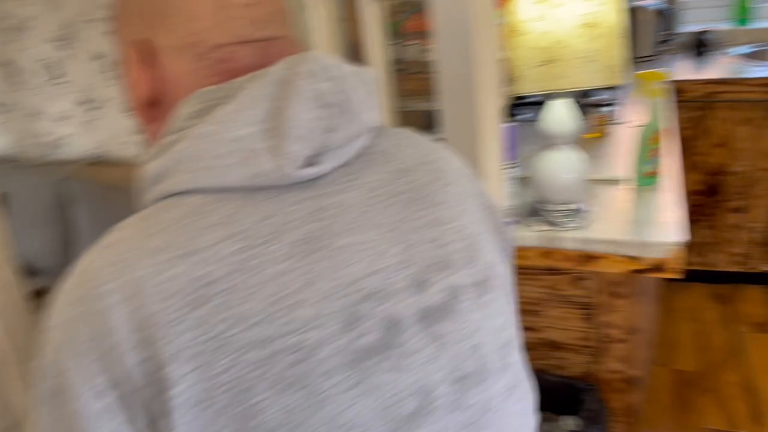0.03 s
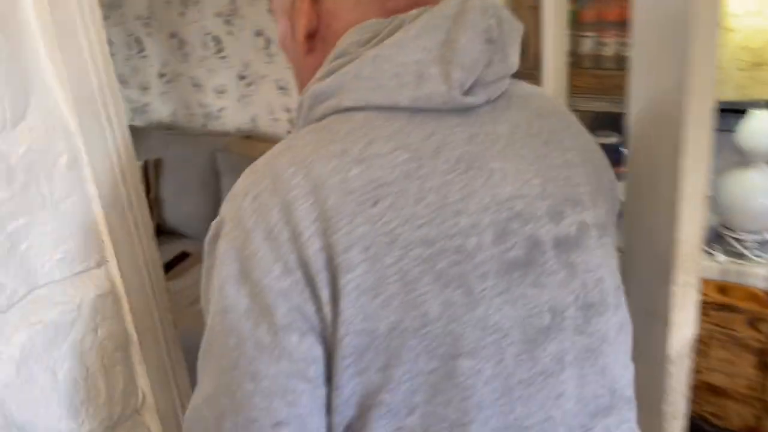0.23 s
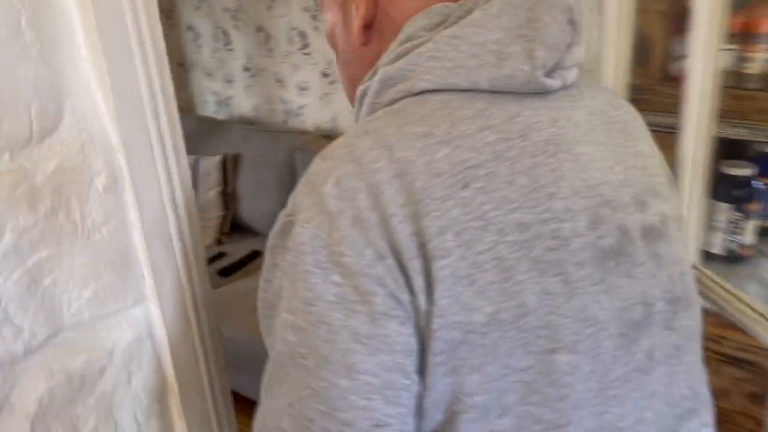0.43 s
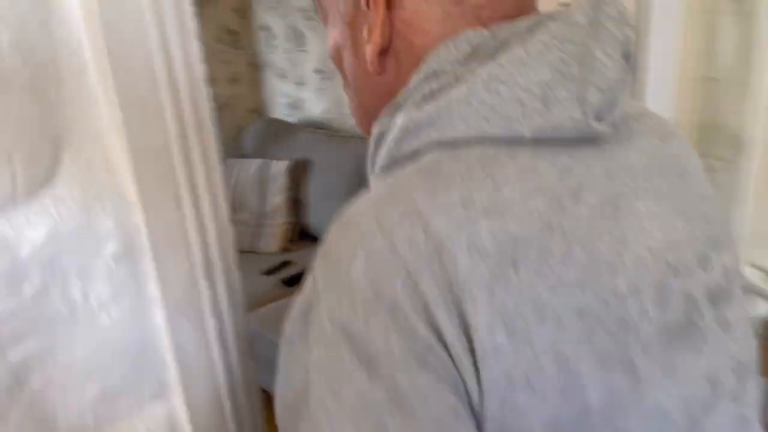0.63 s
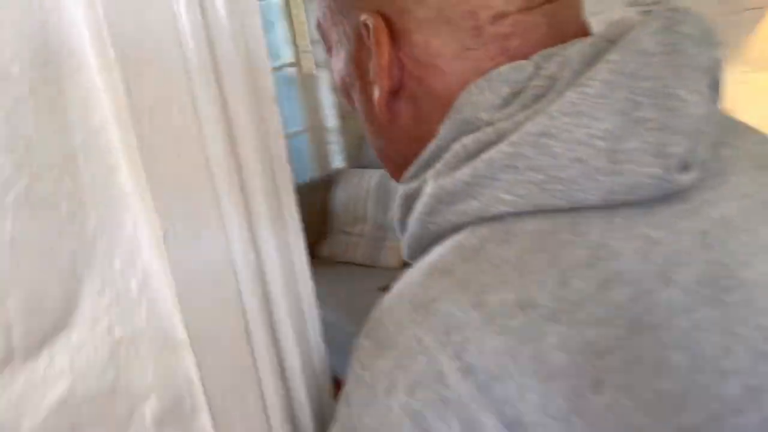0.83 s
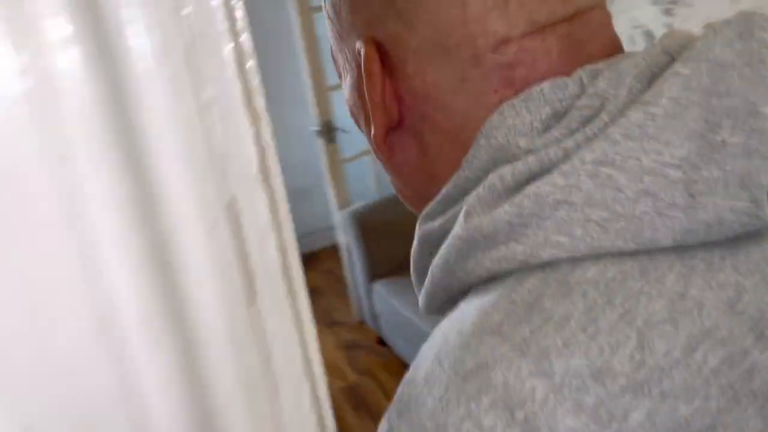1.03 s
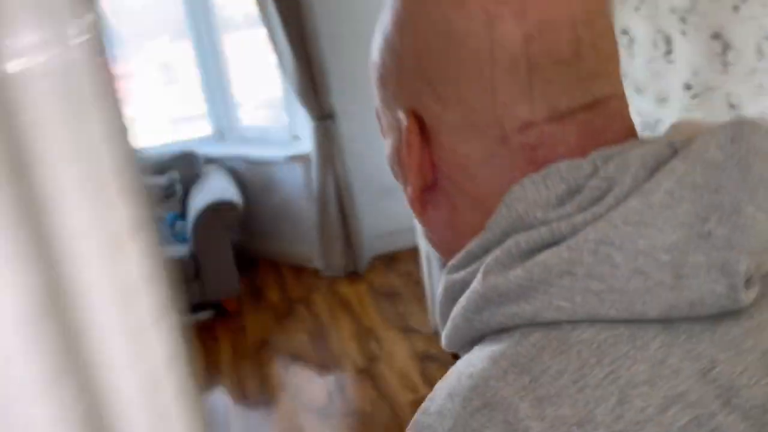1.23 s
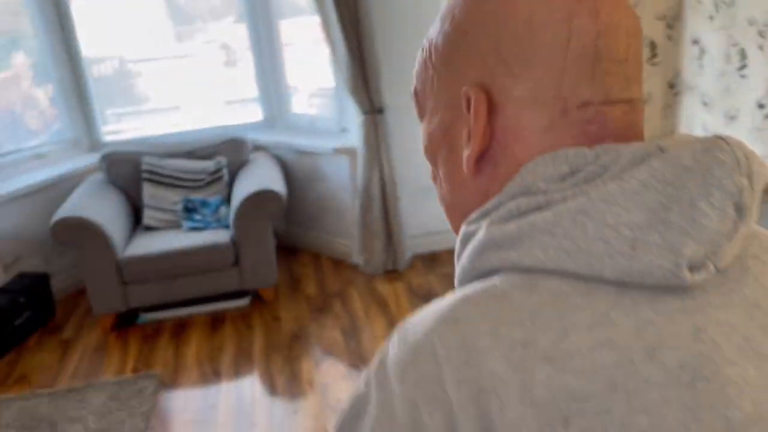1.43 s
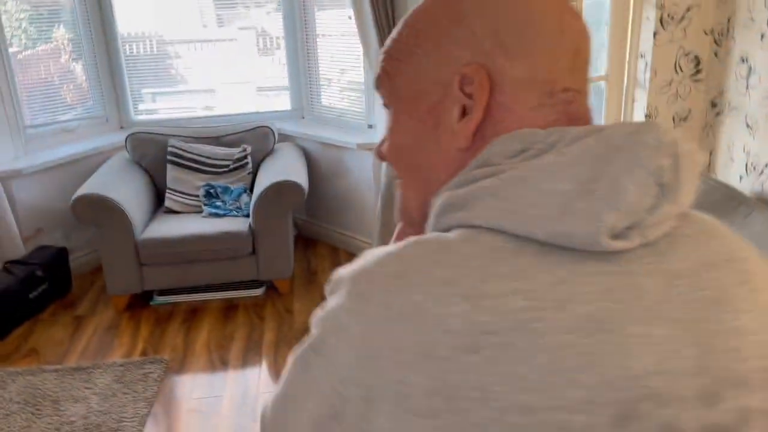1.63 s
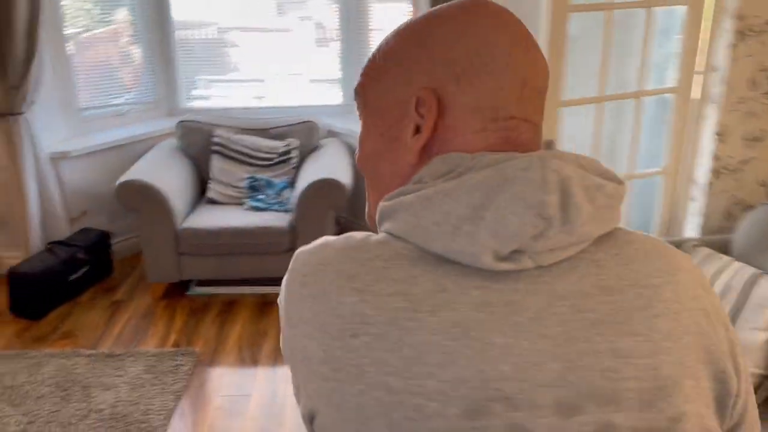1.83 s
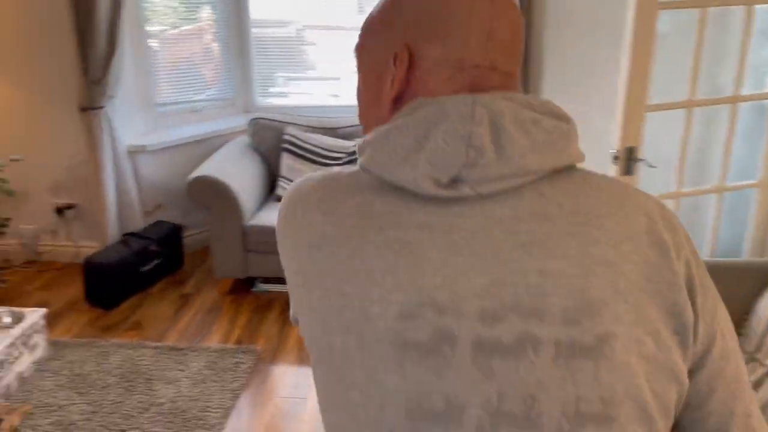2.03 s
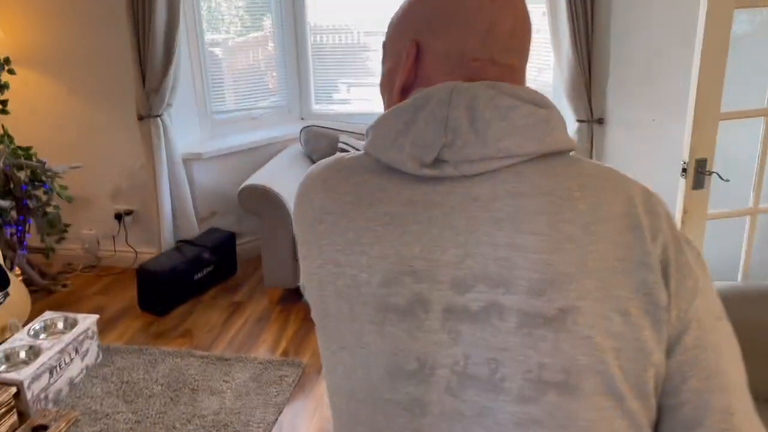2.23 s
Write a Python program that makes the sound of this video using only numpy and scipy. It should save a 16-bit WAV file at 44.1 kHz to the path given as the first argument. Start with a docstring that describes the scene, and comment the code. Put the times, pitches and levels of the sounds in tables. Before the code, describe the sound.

Footsteps on a laminate floor in a furnished living room: close grainy cloth rubbing first, then dull hollow knocks and soft sole scuffs, ending with a hard heel clack; handheld microphone, low rumble beneath.

```python
"""Footsteps on a laminate floor, going into a living room, just ahead of a hand-held camera.
Each footfall sends a bending wave through the boards (treble first, bass after); weight booms in the floor,
loaded boards sound sinking notes, and a late heel lands with a hard clack of ringing modes and noise.
Soles scuff and tap as shaped noise; grainy noise makes the clothing, close to the microphone at first.
A rumble that swells and sinks, the quiet air of the house and a few bright ticks lie underneath."""
import sys
import numpy as np
from scipy import signal
from scipy.fft import rfft, irfft
from scipy.io import wavfile
from scipy.ndimage import uniform_filter1d

SR = 44100
rng = np.random.default_rng(int(sys.argv[2]) if len(sys.argv) > 2 else 0)


def to_wav(sig):
    """Store sig (one row per channel, or 1-D mono) as 16-bit WAV at the path in sys.argv[1].

    Samples outside -1..1 are clipped; the rate is SR.
    """
    pcm = np.clip(np.atleast_2d(sig), -1, 1) * 32767
    pcm = np.round(pcm).astype(np.int16)
    wavfile.write(sys.argv[1], SR, pcm.T)  # frames by channels


N = 100724
T = np.arange(N) / SR  # s
HZ = np.fft.rfftfreq(N, 1 / SR)


def amp(db):
    """Decibels to gain."""
    return 10 ** (np.asarray(db) / 20)


def evened(x):
    """Scales to rms 1."""
    return x / np.sqrt(np.mean(x ** 2) + 1e-20)


def read(points, hz):
    """Reads a spectrum on a log-frequency axis."""
    f, value = np.transpose(points)
    return np.interp(np.log(hz + 1), np.log(f + 1), value)


def level(curve, order=1):
    """Gain over time from one dB column of a curve."""
    rows = np.array(curve)
    return amp(np.interp(T, rows[:, 0], rows[:, order]))


def add(mix, s, sound):
    """Mixes a sound in at a time in seconds."""
    part = mix[..., max(round(s * SR), 0):][..., :sound.shape[-1]]
    part += sound[..., :part.shape[-1]]


def wander(hz):
    """Slow chance movement of rms 1, up to a rate."""
    spectrum = rfft(rng.standard_normal(N))
    return evened(irfft(spectrum / (1 + (HZ / hz) ** 4), N))


def noise(db):
    """Stereo noise of a given spectrum; a shared and an opposed part set how alike left and right are."""
    # likeness of left and right: f/Hz, correlation
    likeness = [(60, 0.83), (130, 0.95), (280, 0.84), (600, 0.37), (1300, 0.26), (6000, 0.018),
                (12000, 0.46)]
    a, b = rfft(rng.standard_normal((2, N)))
    same = np.clip(read(likeness, HZ), -1, 1)
    mid = a * np.sqrt(1 + same)
    side = b * np.sqrt(1 - same)
    return evened(irfft(np.array([mid + side, mid - side]) * amp(db), N))


def friction(db, grain, catch_hz=260, clump_hz=35):
    """Rubbing noise that comes in tiny catches and clumps of catches."""
    catches = wander(catch_hz) + .5 * wander(clump_hz)
    return evened(noise(db) * np.exp(grain * catches))


def folds(x):
    """Shifting folds of cloth favour now one band, now another."""
    patch_db = 3.0
    z = signal.stft(x, nperseg=512)[2]
    patches = rng.standard_normal(z.shape[1:])
    patches = uniform_filter1d(patches, size=4, axis=0)  # across frequency
    patches = uniform_filter1d(patches, size=7, axis=1)  # across time
    folded = signal.istft(z * amp(patch_db * evened(patches)), nperseg=512)[1]
    return evened(folded[:, :N])


def band(hz, octaves_wide, skirt_db):
    """Spectrum in dB of one broad resonance on sloping skirts."""
    octaves = np.log2((HZ + 1) / hz)
    return np.maximum(-4 * (octaves / octaves_wide) ** 2, skirt_db - 3 * octaves ** 2)


def swell(s, rise, fall):
    """Smooth bell-shaped swell with its peak at a time."""
    return np.exp(-.5 * ((T - s) / np.where(T < s, rise, fall)) ** 2)


def room(x):
    """Diffuse tail of the living room, each band dying at its own speed."""
    # decay of the room: f/Hz, t60/s
    decay_times = [(60, 0.83), (250, 0.19), (1000, 0.44), (3000, 0.33), (7000, 0.18)]
    delay_s = 0.0038
    hz, t, z = signal.stft(noise(0)[:, :SR // 2], SR, nperseg=256)
    decay = amp(-60 * t / read(decay_times, hz)[:, None])
    tail = signal.istft(z * decay, SR, nperseg=256)[1]
    tail *= np.clip(T[:tail.shape[1]] / delay_s - 1, 0, 1)  # silent for one delay, full after two
    return signal.fftconvolve(x[None], tail / np.linalg.norm(tail[0]), axes=1)


def background():
    """Low rumble that swells and sinks as the camera is carried, over the quiet air of the house."""
    # rumble of the carried camera and the floor: t/s, level/dB
    rumble_curve = [(0, -72), (.08, -51.5), (.16, -44.5), (.44, -44.5), (.55, -60.5), (.7, -54), (.8, -88),
                    (.9, -43.5), (1, -46.5), (1.15, -53), (1.27, -56), (1.45, -41), (1.55, -61.5),
                    (1.8, -60.5), (2, -59), (2.28, -49)]
    # its spectrum: f/Hz, relative level/dB
    rumble_colour = [(20, -67), (40, -13.5), (62, -2.5), (80, -5), (120, -15), (200, -24), (400, -76),
                     (1000, -84)]
    # spectrum of the house air: f/Hz, relative level/dB
    air_colour = [(20, 0.5), (35, -15), (70, -3), (128, -4), (250, -8), (600, -14), (1500, -23),
                  (5000, -42.5), (10000, -83), (13500, -42)]
    air_db, evening = -55, .6  # evening: how far the noise's own chance swings are divided out
    rumble = noise(read(rumble_colour, HZ))
    swing = np.sqrt(np.mean(abs(signal.hilbert(rumble)) ** 2, axis=0) + .1)
    rumble = level(rumble_curve) * evened(rumble / swing ** evening)
    return rumble + amp(air_db) * noise(read(air_colour, HZ))


def clothes():
    """Cloth friction: a sleeve rubs close to the microphone at first, and softer swishes come and go."""
    # sleeve brushing close by: t/s, relative level of the body/dB, relative level of the rasp/dB
    brush = [(0, -38, -62), (.025, -42, -63), (.05, -46.5, -65), (.1, -42, -51.5), (.138, -44.5, -40.5),
             (.19, -45, -38), (.33, -42.5, -40), (.45, -41, -51), (.47, -49, -44), (.52, -51, -54.5),
             (.54, -41, -50.5), (.6, -84, -52.5), (.64, -61, -58), (.72, -62, -73)]
    # spectra of its body and rasp: f/Hz, relative level/dB
    body_colour = [(59, -54), (100, 3), (359, 7), (403, -4), (471, 6), (617, -67), (888, -15), (1200, -6),
                   (1560, -6), (2640, -120)]
    rasp_colour = [(350, 2), (600, -0.5), (790, -6), (895, 4.5), (1170, -6.5), (1410, 5), (1560, -1.5),
                   (1850, -0.5), (2100, -9.5), (2400, -15), (2630, -17), (2780, -1), (3320, -7), (3850, -3),
                   (4760, -5), (6200, -13.5), (7500, -28.5), (9750, -94), (16500, -74)]
    # stereo tilt of the rasp: f/Hz, left minus right/dB
    brush_pan = [(600, -3.5), (1200, -2), (1800, 14), (2300, 22.5), (3000, -5), (4500, -1), (6000, -6),
                 (7500, -1)]
    # clothes swishing: t/s, relative level of the swish/dB, relative level of its fizz/dB
    swish_curve = [(0, -46, -56.5), (.07, -64.5, -71), (.15, -49, -59), (.34, -56, -61), (.4, -48.5, -60),
                   (.47, -50.5, -55.5), (.5, -51.5, -58.5), (.56, -54, -58), (.66, -65.5, -73),
                   (.82, -68.5, -73.5), (.86, -58, -60.5), (.98, -57.5, -66), (1.08, -66.5, -69),
                   (1.15, -67.5, -72), (1.24, -54, -64.5), (1.33, -65.5, -76), (1.4, -59.5, -68.5),
                   (1.47, -68.5, -72.5), (1.58, -79, -74), (1.7, -61.5, -65.5), (1.78, -56.5, -57),
                   (1.88, -65.5, -73), (2, -65, -74.5), (2.18, -73.5, -79.5), (2.28, -59, -64.5)]
    # spectra of swish and fizz: f/Hz, relative level/dB
    swish_colour = [(400, -15), (900, -5.5), (2000, 5), (3000, 2.5), (4500, 2.5), (6200, -1), (7500, -20),
                    (10000, -54), (14000, -35)]
    fizz_colour = [(3000, -30), (7000, -6), (9500, 0), (11500, 0), (13000, -7), (14500, -22)]
    body_db, rasp_db, swish_db, fizz_db = -4.5, -0.5, 0.5, -2.5  # added to the curves
    brush_grain, swish_grain = .24, 0.13
    brush_end_s = 0.02  # time constant of the fade after the last brush point

    pan = np.array([[.5], [-.5]]) * read(brush_pan, HZ)
    body = friction(read(body_colour, HZ), brush_grain)
    body *= amp(body_db) * level(brush)
    rasp = folds(friction(read(rasp_colour, HZ) + pan, brush_grain))
    rasp *= amp(rasp_db) * level(brush, order=2)
    release = np.exp(-np.maximum(T - brush[-1][0], 0) / brush_end_s)
    swish = folds(friction(read(swish_colour, HZ), swish_grain))
    swish *= amp(swish_db) * level(swish_curve)
    fizz = folds(friction(read(fizz_colour, HZ), swish_grain))
    fizz *= amp(fizz_db) * level(swish_curve, order=2)
    return (body + rasp) * release + swish + fizz


def footfalls():
    """A short push spreads through the boards; low notes travel slower, so each knock chirps downward."""
    # heel and toe blows: t/s, relative level/dB, lower edge f/Hz, upper edge f/Hz,
    # delay of the wave at 1 kHz/s, room against direct/dB
    blows = [(0.07, -12.5, 610, 1700, 0.01, -3), (0.122, -3, 170, 462, .004, -26),
             (0.837, 8, 124, 199, .0045, -6.5), (0.873, -18, 200, 600, .002, 6.5),
             (0.900, -9.5, 200, 750, .003, -5.5), (0.915, 8.5, 105, 213, 0.0055, -7.5),
             (1.114, -13, 151, 785, 0.0041, -3), (1.184, -9.5, 171, 420, 0.0044, 0),
             (1.313, -4, 196, 1020, 0.0059, -7.5), (1.317, 2, 127, 218, .004, -2),
             (1.607, -17.5, 248, 604, 0.0035, 5), (1.69, -23, 565, 870, 0.0038, -1),
             (1.984, -7, 110, 217, .005, 1.5), (2.0669, 17, 200, 210, .0032, -10),
             (2.112, 7, 184, 275, .0035, -13.5)]
    low_slope, high_slope, shelf_db = 2.3, 2.9, -32
    board_top_hz, knock_db = 1880, 7.5
    ripple_db, scatter_rad = 3, .9  # both reach full size at 1 kHz
    right_delay_s = 0.00026  # the knocks reach the left microphone first
    out, size = np.zeros((2, N)), 8192
    hz = np.fft.rfftfreq(size, 1 / SR) + 1
    treble = np.minimum(hz / 1000, 1)
    for s, db, low_hz, high_hz, delay, room_db in blows:
        push = 1 / np.hypot(1, (hz / high_hz) ** high_slope) + amp(shelf_db)
        push /= np.hypot(1, (low_hz / hz) ** low_slope)
        push /= np.hypot(1, (hz / board_top_hz) ** 3)
        # each spot of the floor answers differently
        ripple = evened(uniform_filter1d(rng.standard_normal(len(hz)), size=24))
        push *= amp(ripple_db * ripple * treble)
        lag = 4 * np.pi * delay * np.sqrt(1000 * hz)  # phase of a bending wave, rad
        # plank joints scatter the short waves
        joints = evened(uniform_filter1d(rng.standard_normal(len(hz)), size=30))
        lag += scatter_rad * joints * treble
        knock = amp(db + knock_db) * irfft(push * np.exp(-1j * lag))[:size // 2]
        add(out[0], s, knock)
        add(out[1], s + right_delay_s, knock)
        add(out, s, amp(room_db) * room(knock))
    return out


def taps():
    """The sole meets the floor in pieces: each is a short, gritty tap."""
    # taps of a sole settling: t/s, level/dB, centre f/Hz, decay time constant/s
    tap_rows = [(0.074, -48, 1290, 0.015), (0.7014, -50, 1100, 0.0058), (0.121, -46.5, 1500, 0.0072),
                (0.839, -51.5, 1060, 0.0077), (0.9005, -43, 1590, 0.0021), (0.906, -63, 950, 0.0045),
                (0.9175, -38, 1010, 0.002), (0.924, -66, 1300, 0.0024), (0.945, -58, 940, 0.002),
                (1.116, -56, 1000, 0.0087), (1.609, -57, 1080, 0.0058), (1.693, -45.5, 770, 0.0071),
                (1.972, -51, 1200, .005), (1.988, -52, 900, .003), (2.044, -54, 1590, .004)]
    octaves_wide, skirt_db, rise_s, room_db = 0.7, -50, 0.0014, -5
    out, t = np.zeros((2, N)), T[:SR // 20]
    for s, db, hz, decay in tap_rows:
        grit = evened(noise(band(hz, octaves_wide, skirt_db))[0, :len(t)])
        tap = amp(db) * grit * np.minimum(t / rise_s, 1) * np.exp(-t / decay)
        add(out, s, tap)
        add(out, s, amp(room_db) * room(tap))
    return out


def rubs():
    """A fold of the sleeve catches and slips: a brief swell of grainy friction in one band."""
    # folds catching: t of the peak/s, half length/s, level/dB, centre f/Hz, width/octaves
    rub_rows = [(0.122, .003, -61, 11700, .04), (0.182, 0.022, -45, 2590, 0.016),
                (0.192, .008, -46, 1900, 0.13), (0.212, 0.0043, -43, 3900, 0.13),
                (0.279, 0.0048, -42, 1810, 0.16), (0.32, .03, -47, 1800, 0.23),
                (0.3, 0.0029, -53, 4100, 0.17), (0.429, 0.0088, -48.5, 11300, 0.11),
                (0.473, 0.0055, -47.5, 5600, 0.92), (0.544, .004, -48.5, 5400, 0.16),
                (0.567, 0.007, -59, 11200, 0.11)]
    skirt_db, grain = -32, .25
    out = np.zeros((2, N))
    for s, length, db, hz, wide in rub_rows:
        out += amp(db) * swell(s, length, length) * friction(band(hz, wide, skirt_db), grain)
    return out


def scuffs():
    """Soles slide on the boards: friction in a dull, grainy swell."""
    # slides: t of the peak/s, rise/s, fall/s, level/dB, centre f/Hz, width/octaves
    slides = [(0.59, 0.021, 0.073, -53.5, 836, 0.37), (0.885, 0.012, 0.022, -54.5, 836, 0.3),
              (1.025, 0.01, 0.04, -55.5, 695, 0.32), (1.123, 0.014, 0.0035, -55, 785, 0.39),
              (1.255, 0.046, 0.047, -51, 950, 0.48), (1.272, 0.019, 0.03, -44.5, 497, 0.46),
              (1.42, 0.021, 0.043, -46.5, 360, 0.38), (1.71, 0.074, 0.05, -63, 2300, 0.11),
              (1.705, 0.03, 0.055, -62.5, 1460, 0.037), (1.714, 0.17, 0.0092, -53.5, 168, 0.37),
              (1.71, 0.015, 0.062, -57, 708, 0.1), (1.849, 0.015, 0.028, -57, 556, 0.7),
              (2.22, 0.0071, 0.06, -59, 1230, 0.57), (2.274, 0.021, 0.056, -41.5, 293, 0.68)]
    skirt_db, grain = -16, .3
    out = np.zeros((2, N))
    for s, rise, fall, db, hz, wide in slides:
        out += amp(db) * swell(s, rise, fall) * friction(band(hz, wide, skirt_db), grain)
    return out


def clacks():
    """A hard edge meets the laminate: a crack, a brief ring, and the room's answer."""
    # hard clicks of the heel: t/s, level/dB
    clicks = [(0.619, -47.5), (0.703, -48.5), (0.877, -47), (2.0668, -27), (2.0707, -34.5)]
    # ring of heel and plank: f/Hz, relative level/dB, t60/s
    plank = [(884, -4, 0.019), (1350, -4.5, 0.0089), (1938, -5, 0.014), (2414, -9, 0.027),
             (2723, -4, 0.033), (3250, -14, 0.023), (3930, -12.5, 0.016), (4190, -11.5, 0.0068),
             (4950, -15, 0.013), (6540, -18.5, 0.011)]
    # spectrum of the crack: f/Hz, relative level/dB
    crack_colour = [(300, -39), (1400, -1), (2200, -8.5), (3700, 14.5), (5000, 2), (6500, -10), (8500, -28)]
    rise_s, crack_db, crack_s = 0.00081, -8, .003
    ring_room_db, crack_room_db = -7, -0.5
    out, t = np.zeros((2, N)), T[:SR // 8]
    for s, db in clicks:
        ring = np.zeros(len(t))
        for k, (hz, d, t60) in enumerate(plank):
            ring += (-1) ** k * amp(d - 60 * t / t60) * np.sin(2 * np.pi * hz * t)
        crack = noise(read(crack_colour, HZ))[0, :len(t)]
        crack *= amp(crack_db) * np.exp(-t / crack_s)
        attack = amp(db) * (1 - np.exp(-(t / rise_s) ** 2))
        add(out, s, attack * (ring + crack))
        to_room = amp(ring_room_db) * ring + amp(crack_room_db) * crack
        add(out, s, room(attack * to_room))
    return out


def ticks():
    """Small, bright, dry ticks of decaying noise."""
    # ticks: t/s, level/dB
    tick_rows = [(0.619, -67), (1.075, -56), (1.176, -57), (1.369, -60), (1.95, -63.5), (2.042, -64)]
    # their spectrum: f/Hz, relative level/dB
    tick_colour = [(2000, -14), (6000, -38), (10000, 23), (13000, -2)]
    decay_s = 0.0057
    out, t = np.zeros((2, N)), T[:SR // 25]
    for s, db in tick_rows:
        grit = noise(read(tick_colour, HZ))[:, :len(t)]
        add(out, s, amp(db) * np.exp(-t / decay_s) * grit)
    return out


def boards():
    """A board flexing under the foot gives a short, hollow, wavering note that sinks a little."""
    # board notes: t/s, start f/Hz, sag of the pitch/(1/s), level/dB, rise/s, t60/s
    notes = [(0.843, 151, 0.97, -40, 0.0025, .07), (0.925, 181.6, 2.7, -32.5, 0.0091, 0.12),
             (1.613, 287.6, 2.4, -37.5, 0.024, 0.33), (2.0738, 246, 0.97, -31.5, 0.0015, 0.098),
             (2.086, 130, 0.6, -30.5, 0.013, 0.14), (2.114, 288, 0.28, -34.5, 0.0016, 0.15)]
    waver, waver_hz, room_db = .06, 170, -8.5
    out, t = np.zeros((2, N)), T[:SR // 4]
    for s, start_hz, sag, db, rise, t60 in notes:
        hz = start_hz * np.exp(-sag * t) * (1 + waver * wander(waver_hz)[:len(t)])
        shape = np.minimum(t / rise, 1) * amp(-60 * np.maximum(t - rise, 0) / t60)
        note = amp(db) * shape * np.sin(2 * np.pi * np.cumsum(hz) / SR)
        add(out, s, note)
        add(out, s, amp(room_db) * room(note))
    return out


def boom():
    """The walker's weight sets the low modes of floor and room swinging."""
    # weight landing on the floor: t/s, level/dB, rise/s
    loads = [(0.929, -44.5, 0.0053), (1.083, -43, 0.019), (1.322, -41.5, 0.019), (1.391, -51, 0.017),
             (1.883, -51, 0.0085), (2.078, -40.5, 0.026)]
    # modes of the floor and room: f/Hz, relative level/dB, t60/s
    modes = [(60.9, 12, 0.23), (79, -14, 0.18), (133, -5, 0.43), (168, -20, 0.084)]
    out, t = np.zeros((2, N)), T[:SR // 2]
    for s, db, rise in loads:
        ring = sum(amp(d - 60 * t / t60) * np.sin(2 * np.pi * hz * t) for hz, d, t60 in modes)
        add(out, s, amp(db) * np.minimum(t / rise, 1) * ring)
    return out


def scene():
    """Steps, clothes, ticks and the house together."""
    steps = footfalls() + taps() + scuffs() + clacks()
    floor = boards() + boom()
    cloth = clothes() + rubs()
    return background() + steps + floor + cloth + ticks()


def record(dry):
    """The microphone's low cut and the recorder's band limit."""
    low_cut_hz, edge_hz = 21, 13700
    low_cut = signal.butter(2, low_cut_hz, "highpass", fs=SR, output="sos")
    thinned = signal.sosfilt(low_cut, dry)
    band_limit = signal.firwin(255, edge_hz, window=("kaiser", 8), fs=SR)
    return signal.oaconvolve(thinned, band_limit[None], "same")


dry = scene()
out = record(dry)
to_wav(out)
```